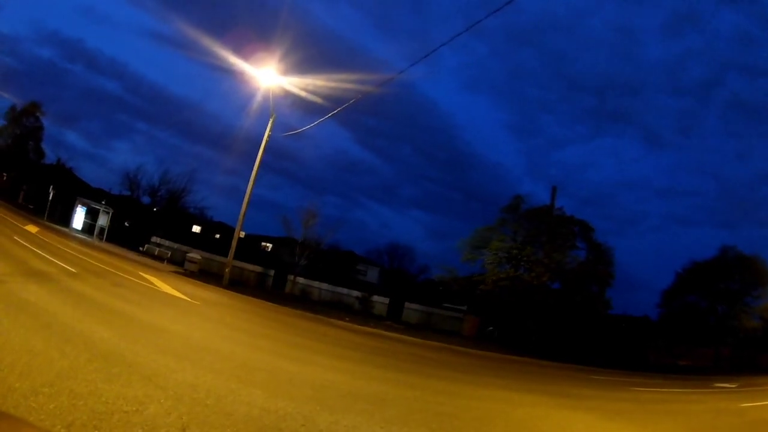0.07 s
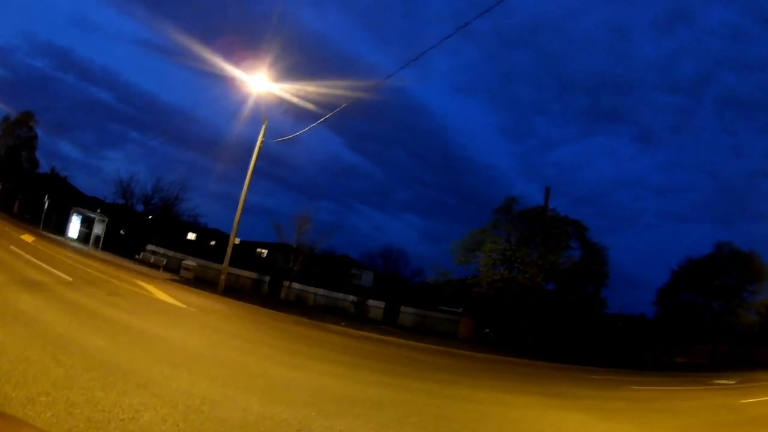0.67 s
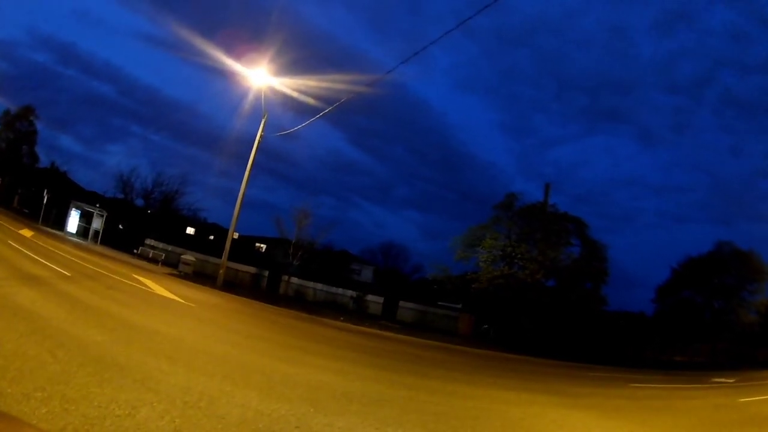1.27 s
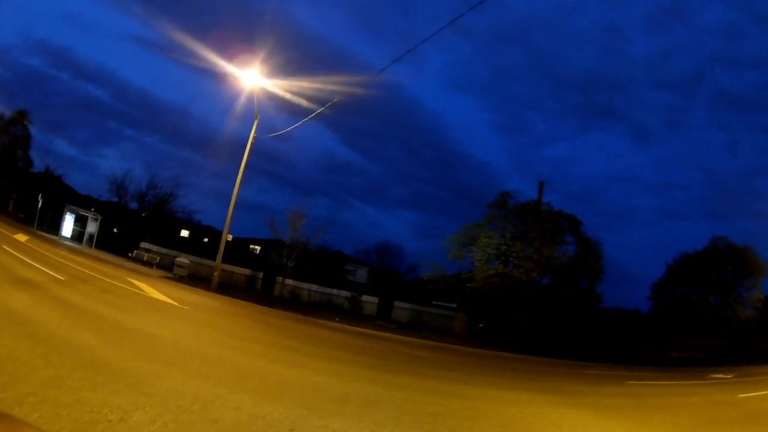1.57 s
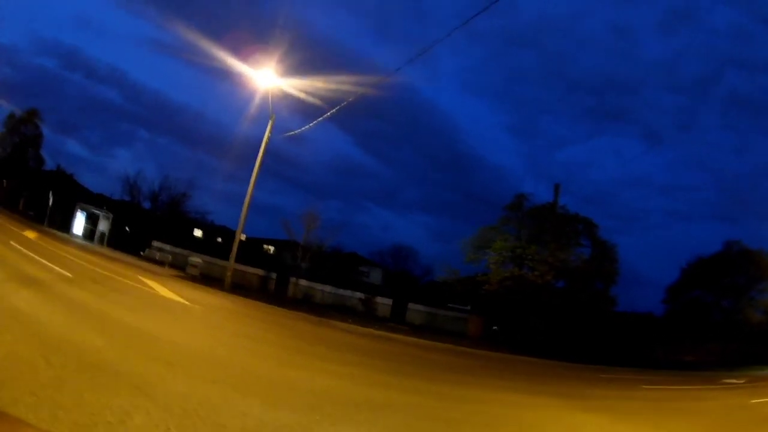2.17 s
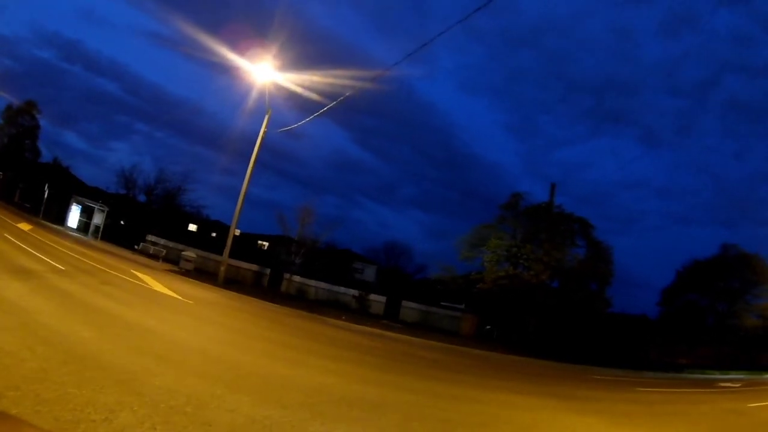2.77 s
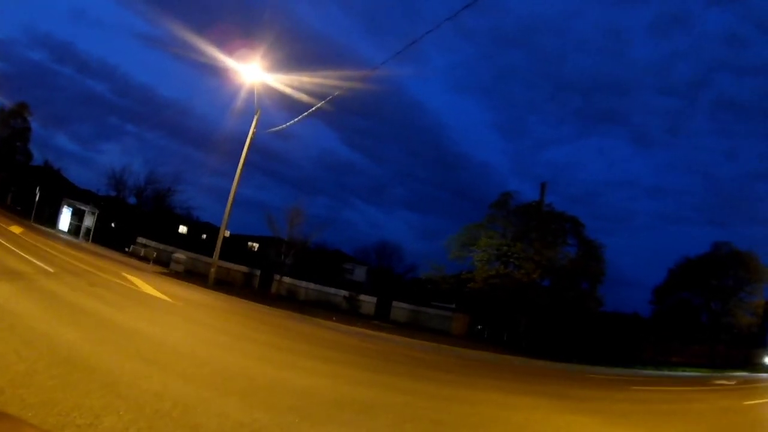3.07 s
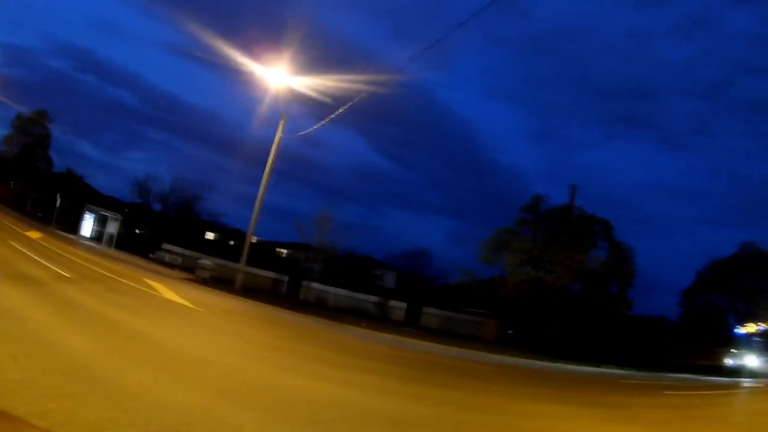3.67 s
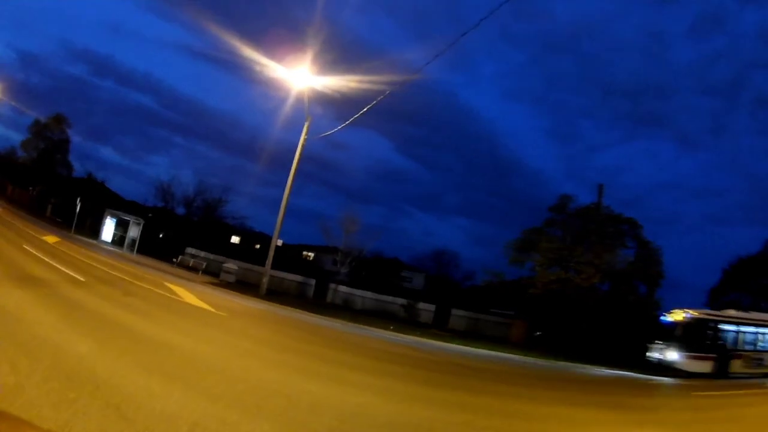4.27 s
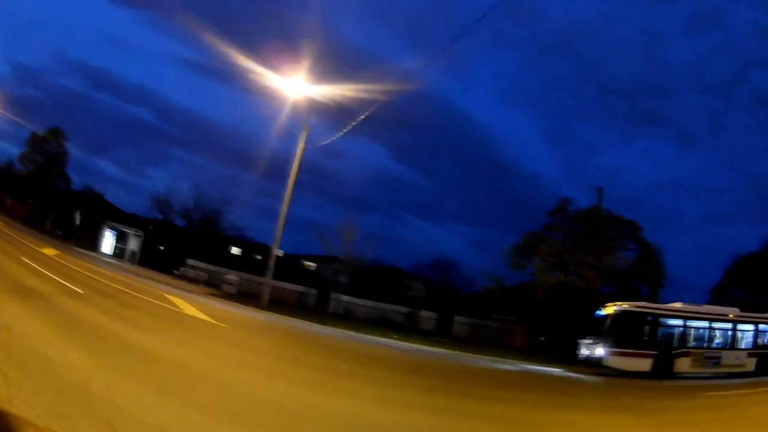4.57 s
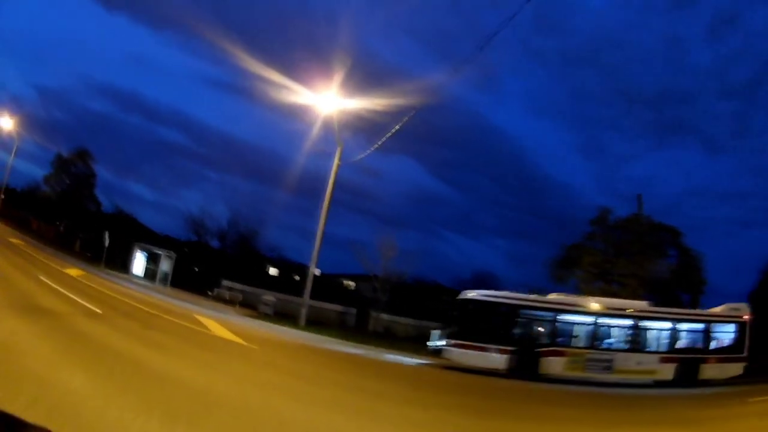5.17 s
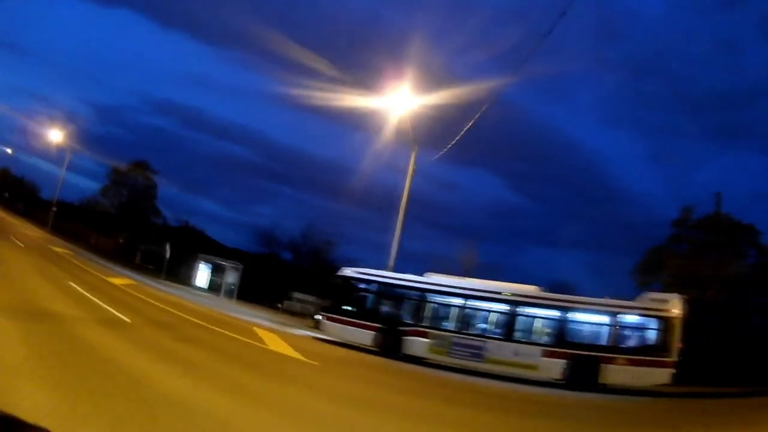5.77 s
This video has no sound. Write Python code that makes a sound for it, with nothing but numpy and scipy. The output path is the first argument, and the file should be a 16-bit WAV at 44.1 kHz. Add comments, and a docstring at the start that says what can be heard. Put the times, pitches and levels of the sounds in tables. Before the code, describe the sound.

A city bus drones closer over dull distant traffic and passes with a surging whine, while the microphone's plastic case knocks, rubs and creaks.

```python
"""Distant traffic and the tyres of a receding car at a roadside at night; then a city bus drones nearer
and passes with a roar and rumble. All is heard from a camera in a closed plastic case, which muffles
the traffic. Swung after the bus, the case knocks, ticks, scrapes and creaks as blows and tiny slips
ring its modes. As the bus comes closest, a rasping whine climbs in surges and just overloads the
microphone."""
import sys
import numpy as np
from scipy import signal
from scipy.fft import rfft, irfft
from scipy.io import wavfile
from scipy.ndimage import uniform_filter1d

SR = 44100
rng = np.random.default_rng(int(sys.argv[2]) if len(sys.argv) > 2 else 0)


def int16_out(signal):
    """Quantize to a 16-bit WAV file."""
    q = np.round(np.clip(np.atleast_2d(signal).T, -1, 1) * 32767)
    wavfile.write(sys.argv[1], SR, q.astype(np.int16))


N = 265658
TIME = np.arange(N) / SR


def from_db(db):
    return 10 ** (np.asarray(db) / 20)


def unit_rms(x):
    return x / np.sqrt(np.mean(x ** 2) + 1e-20)


def add(mix, start_s, sound):
    part = mix[round(start_s * SR):][:len(sound)]
    part += sound[:len(part)]


def spectrum_gain(spectrum, hz):
    """Gain at hz, interpolated between (Hz, dB) points."""
    points_hz, db = np.transpose(spectrum)
    return from_db(np.interp(np.log(hz + 1), np.log(points_hz + 1), db))


def drift(rate_hz):
    """Slow random motion, rms 1."""
    hz = np.fft.rfftfreq(N, 1 / SR)
    return unit_rms(irfft(rfft(rng.standard_normal(N)) / (1 + (hz / rate_hz) ** 4), N))


def wash(spectrum, patchy_db):
    """Coloured noise whose bands swell and fade in small patches, rms 1."""
    hz = np.fft.rfftfreq(2048, 1 / SR)
    real, imag, patches = rng.standard_normal((N // 512 + 5, len(hz), 3)).T
    patches = uniform_filter1d(patches, size=12, axis=0)
    patches = unit_rms(uniform_filter1d(patches, size=9, axis=1))
    frames = (real + 1j * imag) * spectrum_gain(spectrum, hz)[:, None] * from_db(patchy_db * patches)
    return unit_rms(signal.istft(frames, nperseg=2048, noverlap=1536)[1][:N])


def ring(force, modes, top_hz):
    """A force drives steep resonances (Hz, width Hz, dB); soft contact rolls off the treble."""
    out = np.zeros(len(force))
    for hz, width_hz, db in modes:
        b, a = signal.iirpeak(hz, hz / width_hz, fs=SR)
        out += from_db(db) * signal.lfilter(b, a, signal.lfilter(b, a, force))
    return signal.sosfilt(signal.butter(2, top_hz, fs=SR, output="sos"), out)


def burst(length_s, modes, top_hz, rise_s=0.001):
    """A brief burst of slips rings the modes, peak 1."""
    t = TIME[:SR // 6]
    pressure = (1 - np.exp(-t / rise_s)) * np.exp(-(t / length_s) ** 2)
    sound = ring(rng.standard_normal(len(t)) * pressure, modes, top_hz)
    return sound / abs(sound).max()


def swell(peak_s, db, rise_db_per_s, fall_db_per_s):
    """Gain of a far sound that grows to a peak and fades."""
    return from_db(db - np.maximum(rise_db_per_s * (peak_s - TIME), fall_db_per_s * (TIME - peak_s)))


def held(start_s, length_s, db, attack_s, release_s):
    """Gain that builds up to the start, holds and dies away."""
    rise = np.minimum((TIME - start_s) / attack_s, 0)
    fall = np.maximum((TIME - start_s - length_s) / release_s, 0)
    return from_db(db) * np.exp(rise - fall)


def bell(peak_s, rise_s, fall_s):
    return np.exp(-((TIME - peak_s) / np.where(TIME < peak_s, rise_s, fall_s)) ** 2)


# Far traffic spectrum. Each row: frequency in Hz, relative density in dB.
TRAFFIC_SPECTRUM = [(20, -8), (60, -1), (170, 0.5), (270, -1.5), (335, -4), (480, -6.5), (640, -3),
                    (950, -7.5), (1400, -14), (2000, -23), (2500, -29.5), (3000, -39), (4500, -53.5),
                    (7000, -58)]


def traffic(level_db=-42):
    """Far traffic merges into a steady, dull wash."""
    return from_db(level_db) * wash(TRAFFIC_SPECTRUM, patchy_db=1.0)


def receding_car():
    """Tyre noise peaks early and fades with distance."""
    spectrum_hz_db = [(300, -19), (450, -2.5), (800, -18.5), (1250, 0.5), (1950, -9.5),
                      (2900, -40.5), (6000, -53.5)]
    tyres = wash(spectrum_hz_db, patchy_db=0.0)
    return tyres * swell(peak_s=0.33, db=-44, rise_db_per_s=8, fall_db_per_s=12.5)


def bus_drone():
    """The far bus: noise in three resonances swells and fades."""
    modes = [(259.3, 31, 0.25), (634, 48, -1.1), (720.5, 100, -1.1)]
    drone = unit_rms(ring(rng.standard_normal(N), modes, top_hz=1500))
    return drone * swell(peak_s=2.09, db=-44, rise_db_per_s=7, fall_db_per_s=3.5)


def passing(closest_db, loss_db_per_m, speed_m_per_s=9.74, lane_m=15.25, closest_s=6.4):
    """Gain of a source on a straight lane: spreading plus absorption."""
    distance_m = np.hypot(lane_m, speed_m_per_s * (TIME - closest_s))
    return from_db(closest_db - loss_db_per_m * (distance_m - lane_m)) * lane_m / distance_m


# Roar and rumble spectra. Each row: frequency in Hz, relative density in dB.
ROAR_SPECTRUM = [(20, -10), (65, -1), (200, -4), (260, 2.5), (320, -5.5), (530, -10.5), (730, 1), (930, -5),
                 (1350, -7), (2300, -25.5), (3300, -34), (4400, -36), (5600, -45), (7200, -65.5)]
RUMBLE_SPECTRUM = [(12, -16.5), (30, -6), (60, 4.5), (100, -2.5), (160, -17), (300, -18.5), (1200, -65.5)]


def bus():
    """The roar carries far; the rumble emerges only close by."""
    roar = passing(closest_db=-33, loss_db_per_m=0.16) * wash(ROAR_SPECTRUM, patchy_db=-1.5)
    rumble = passing(closest_db=-41.5, loss_db_per_m=0.6) * wash(RUMBLE_SPECTRUM, patchy_db=4.5)
    return roar + rumble


# Modes of the stiff latch and mount. Each row: frequency in Hz, width in Hz, relative gain in dB.
LATCH_MODES = [(1196, 610, 27), (1620, 31, -13.5), (2220, 260, 13), (3060, 230, -1), (3450, 550, -2),
               (3800, 910, -7.5), (5400, 760, -12.5)]


def latch_snap(centre_hz, length_s, focus_db=9):
    """A blow on the latch rings the modes near centre_hz, peak 1."""
    modes = [(hz, width_hz, db - focus_db * np.log2(hz / centre_hz) ** 2)
             for hz, width_hz, db in LATCH_MODES]
    return burst(length_s, modes, top_hz=6500)


# Modes of the case. Each row: frequency in Hz, width in Hz, relative gain in dB.
CASE_MODES = [(165, 110, -10), (338.8, 23, 10), (427, 79, 1.5), (726.6, 174, 3), (803.5, 69, -0.5),
              (988, 43, -1), (1254, 190, -13), (1492, 66, -16.5), (2530, 130, -29.5), (2740, 250, -25),
              (4300, 610, -42.5)]
# Knocks and short scrapes. Each row: start in seconds, body level in dB, snap level in dB,
# snap centre in Hz, length in seconds.
CASE_KNOCKS = [(1.526, -32, -31, 1930, 0.0038), (1.612, -26.5, -25, 3470, 0.0038),
               (2.051, -26.5, -41.5, 3320, 0.009), (2.314, -35.5, -33, 1700, 0.1),
               (3.004, -21, -31, 1700, 0.022), (3.06, -31, -45, 4960, 0.0026),
               (3.2315, -7.5, -21.5, 1870, 0.0035), (3.242, -12, -26, 2300, 0.0046),
               (3.349, -13, -28, 1320, 0.024), (3.679, -28, -53.5, 1500, 0.011),
               (4.438, -35, -40, 4860, 0.0019), (4.536, -20.5, -26.5, 2220, 0.018),
               (4.558, -14, -24.5, 3400, 0.0097), (4.659, -21, -32.5, 3200, 0.0056),
               (4.704, -14.5, -12.5, 1870, 0.0034), (5.983, -34, -29.5, 3060, 0.032)]


def knocks(damping=1.27, full_push_s=0.022, thinning_db=4.0):
    """Blows ring the pressed, damped case and snap the latch; short ones drive the low modes less."""
    out = np.zeros(N)
    for start_s, body_db, snap_db, centre_hz, length_s in CASE_KNOCKS:
        cut_db_per_octave = thinning_db * max(np.log2(full_push_s / length_s), 0)
        pressed = [(hz, width_hz * damping, db - cut_db_per_octave * max(np.log2(700 / hz), 0))
                   for hz, width_hz, db in CASE_MODES]
        body = from_db(body_db) * burst(length_s, pressed, top_hz=1400)
        add(out, start_s, body + from_db(snap_db) * latch_snap(centre_hz, length_s))
    return out


def ticks(from_s=2, ticks_per_s=2.7, level_db=-48, spread_db=1.5):
    """The latch ticks faintly at uneven intervals under handling."""
    out = np.zeros(N)
    for slot_s in np.arange(from_s, TIME[-1], 1 / ticks_per_s):
        gain = from_db(level_db + spread_db * rng.standard_normal())
        start_s = slot_s + rng.random() / ticks_per_s
        add(out, start_s, gain * latch_snap(centre_hz=4800, length_s=0.0031))
    return out


def friction(slips_per_s=600, spread_db=2.5, smooth_share=0.051):
    """Force on the case: tiny slips of uneven size over smooth noise."""
    size = from_db(spread_db * np.minimum(rng.exponential(1, N), 3))
    slips = size * (rng.random(N) < slips_per_s / SR) * rng.choice([-1, 1], N)
    return slips + smooth_share * rng.standard_normal(N)


# Strokes on the case. Each row: start in seconds, length in seconds, level in dB.
RUB_STROKES = [(3.002, 0.33, -37), (3.29, 0.075, -30), (4.574, 0.11, -28.5), (4.736, 0.71, -24),
               (5.147, 0.04, -21), (5.663, 0.39, -21)]


def rubbing(force, grit_db=-36):
    """Friction rings the case in strokes; a little grit reaches the latch."""
    scrape = unit_rms(ring(force, CASE_MODES, top_hz=2100))
    grit = from_db(grit_db) * unit_rms(ring(force, LATCH_MODES, top_hz=4150))
    pressure = np.max([held(*stroke, attack_s=0.064, release_s=0.12) for stroke in RUB_STROKES], axis=0)
    return pressure * (scrape + grit)


def grip(force, thud_db=-15, brush_db=-38):
    """The mount booms, thuds and brushes as it is gripped."""
    boom = unit_rms(ring(force, [(139.6, 18, -2.0), (294, 45, -1), (462, 190, -9.0)], top_hz=900))
    thud = from_db(thud_db) * wash(RUMBLE_SPECTRUM, patchy_db=-5)
    brush = from_db(brush_db) * unit_rms(ring(force, [(4340, 1500, 0.66), (5600, 140, 0)], top_hz=6000))
    pressure = held(start_s=3.235, length_s=0.12, db=-32.5, attack_s=0.07, release_s=0.035)
    return pressure * (boom + thud + brush)


# Modes of the creak. Each row: frequency in Hz, width in Hz, relative gain in dB.
TWIST_MODES = [(1346, 170, 7.5), (1580, 60, 10), (2400, 140, 0.5), (2853, 117, 0.5), (2980, 200, -6),
               (3380, 190, -6), (4020, 110, -15), (4600, 660, -29), (5370, 240, -19)]
# Bursts of the creak. Each row: start in seconds, level in dB, length in seconds.
TWIST_BURSTS = [(5.111, -30, 0.0043), (5.134, -18, 0.012), (5.165, -20, 0.012), (5.204, -21.5, 0.0042),
                (5.219, -38, 0.01)]


def creak():
    """The case twists in its mount and rings freely in a quick rattle."""
    out = np.zeros(N)
    for start_s, db, length_s in TWIST_BURSTS:
        add(out, start_s, from_db(db) * burst(length_s, TWIST_MODES, top_hz=7500))
    return out


# Resonances the whine sweeps through. Each row: frequency in Hz, width in Hz, gain in dB.
WHINE_RESONANCES = [(267.6, 59, -3.5), (306, 35, 0.5), (404, 55, 2), (600.4, 26, 2.5), (634, 13, 1.5),
                    (678.6, 65, 6), (828.4, 34, 2.5), (917, 98, -5), (1019, 51, -4.5)]


def whine_tone(pitch_hz, phase, shimmer_db=1.0):
    """Three partials climb through resonances; the higher ones flutter more."""
    tone = np.zeros(N)
    for k in range(1, 4):
        power = sum((from_db(db) / (1 + (2 * (k * pitch_hz - hz) / width_hz) ** 2)) ** 2
                    for hz, width_hz, db in WHINE_RESONANCES)
        flutter = from_db(k * shimmer_db * drift(rate_hz=63))
        tone += np.sqrt(2 * power) * flutter * np.sin(k * phase)
    return tone


# Rasp spectrum. Each row: frequency in Hz, relative density in dB.
RASP_SPECTRUM = [(300, -17), (500, 10.5), (800, 8), (1150, 5), (1450, 6), (1900, -10.5), (2360, 2.5),
                 (2900, -19.5), (4400, -16), (6000, -35.5), (8000, -53.5), (10500, -48), (14000, -66.5)]


def whine_rasp(pitch_hz, phase, upper_db=-1, hiss_db=2, pulse_depth=0.27, grain_db=2, smear_rad=1.0):
    """Smeared upper partials and a grainy hiss pulsed once a cycle."""
    upper = np.zeros(N)
    for k in range(4, 9):
        wobble_rad = smear_rad * drift(rate_hz=66)
        upper += spectrum_gain(RASP_SPECTRUM, k * pitch_hz) * np.sin(k * phase + wobble_rad)
    hiss = wash(RASP_SPECTRUM, patchy_db=2.5) * np.exp(pulse_depth * np.cos(phase))
    hiss *= from_db(grain_db * drift(rate_hz=420))
    return from_db(upper_db) * unit_rms(upper) + from_db(hiss_db) * unit_rms(hiss)


# Surges of the whine. Each row: peak time in seconds, rise in seconds, tone fall in seconds,
# tone gain in dB, rasp gain in dB, rasp fall in seconds.
WHINE_SURGES = [(5.572, 0.036, 0.031, -13, -23.5, 0.03), (5.67, 0.032, 0.046, -12, -24.5, 0.16),
                (5.775, 0.036, 0.041, -11, -25, 0.038), (5.82, 0.015, 0.067, -15.5, -26.5, 0.042),
                (5.996, 0.018, 0.021, -16.5, -57, 0.02)]


def whine(start_s=5.4, attack_s=0.023, start_hz=247.6, climb_hz_per_s=268, jitter=0.0044, floor_db=-24):
    """A rasping tone climbs in surges; the climb slackens briefly after the loudest."""
    sag_hz = 13 * bell(peak_s=5.87, rise_s=0.1114, fall_s=0.1114)
    pitch_hz = start_hz + climb_hz_per_s * np.maximum(TIME - start_s, 0) - sag_hz
    phase = 2 * np.pi * np.cumsum(pitch_hz * (1 + jitter * drift(rate_hz=86))) / SR
    tone_power, rasp_power = from_db(floor_db) ** 2, 0
    for peak_s, rise_s, tone_fall_s, tone_db, rasp_db, rasp_fall_s in WHINE_SURGES:
        tone_power += (from_db(tone_db) * bell(peak_s, rise_s, tone_fall_s)) ** 2
        rasp_power += (from_db(rasp_db) * bell(peak_s, rise_s, rasp_fall_s)) ** 2
    tone = np.sqrt(tone_power) * whine_tone(pitch_hz, phase)
    rasp = np.sqrt(rasp_power) * whine_rasp(pitch_hz, phase)
    return (tone + rasp) * np.clip((TIME - start_s) / attack_s, 0, 1)


def case_wall(blows, cutoff_hz=6000):
    """The wall cuts the highest treble of a blow steeply."""
    return signal.sosfilt(signal.butter(4, cutoff_hz, fs=SR, output="sos"), blows)


def scene(hiss_db=-80):
    """Road and handling noise at one microphone, over its own faint hiss."""
    hiss = from_db(hiss_db) * rng.standard_normal(N)
    road = traffic() + receding_car() + bus_drone() + bus()
    force = friction()
    handling = rubbing(force) + grip(force)
    return (hiss + road + handling + whine() + case_wall(knocks() + creak() + ticks()))[None]


def record(dry, knee=12, band_limit_hz=15750):
    """Soft clip at full scale, then a band limit."""
    clipped = dry / (1 + dry ** knee) ** (1 / knee)
    lowpass = signal.firwin(511, band_limit_hz, window=("kaiser", 9), fs=SR)
    return signal.oaconvolve(clipped, lowpass[None], "same")


dry = scene()
out = record(dry)
int16_out(out)
```